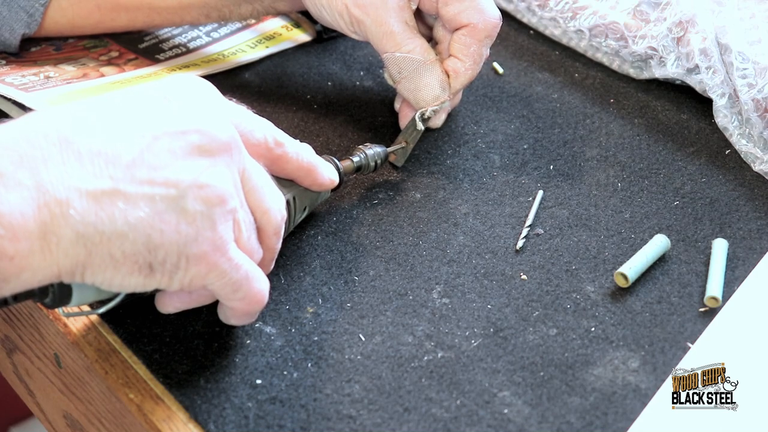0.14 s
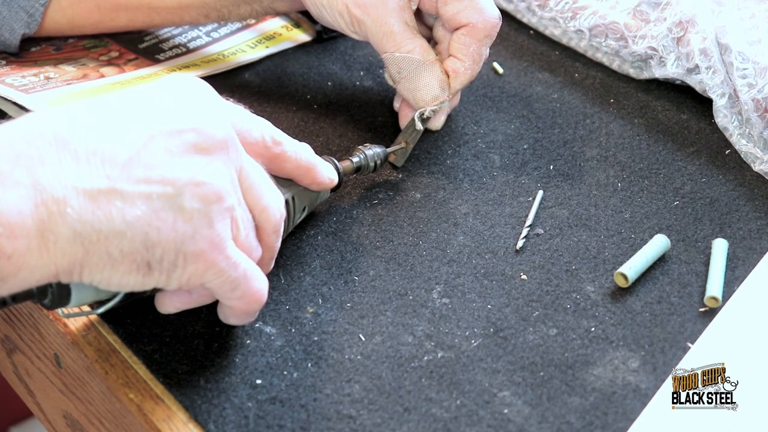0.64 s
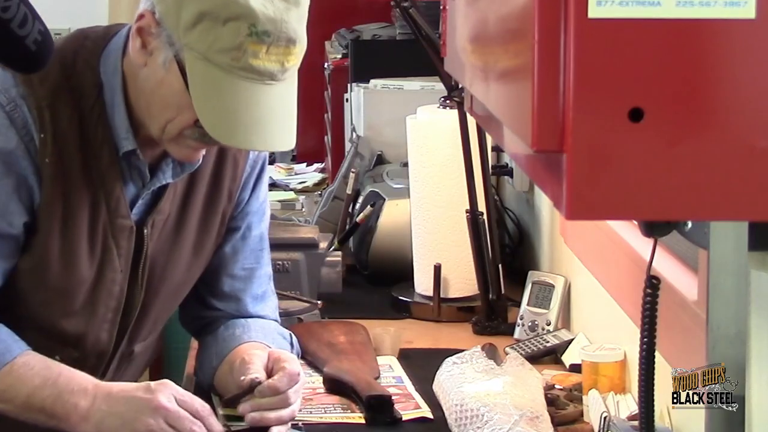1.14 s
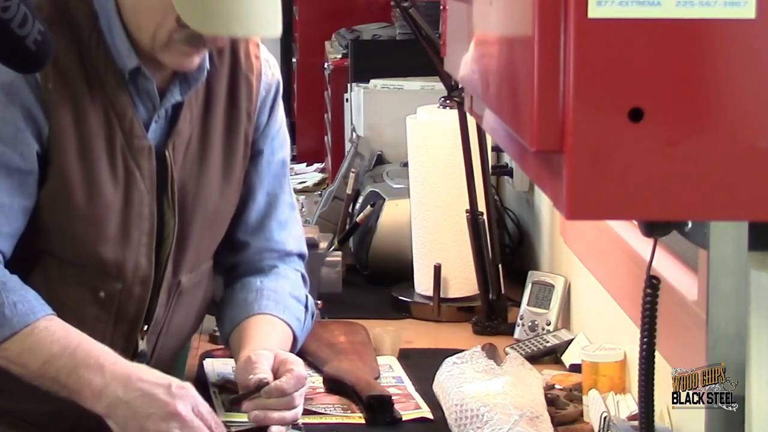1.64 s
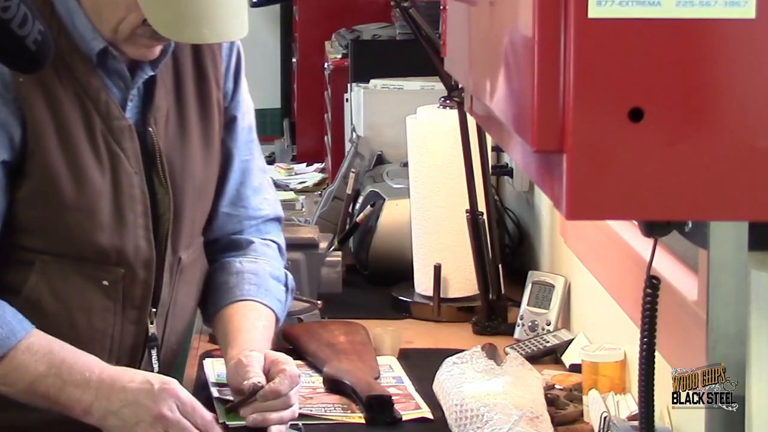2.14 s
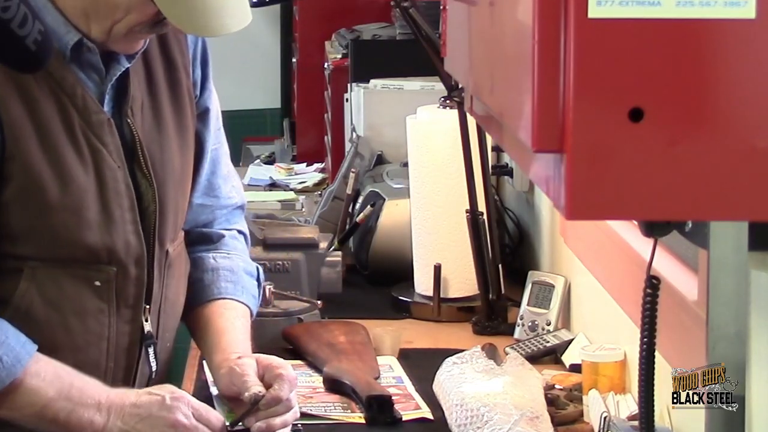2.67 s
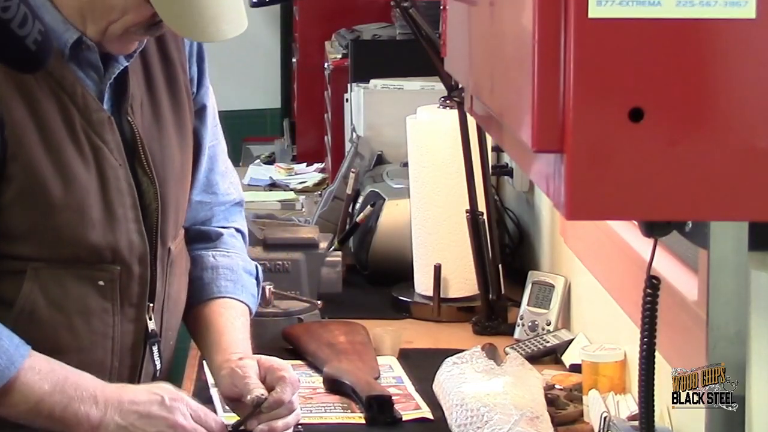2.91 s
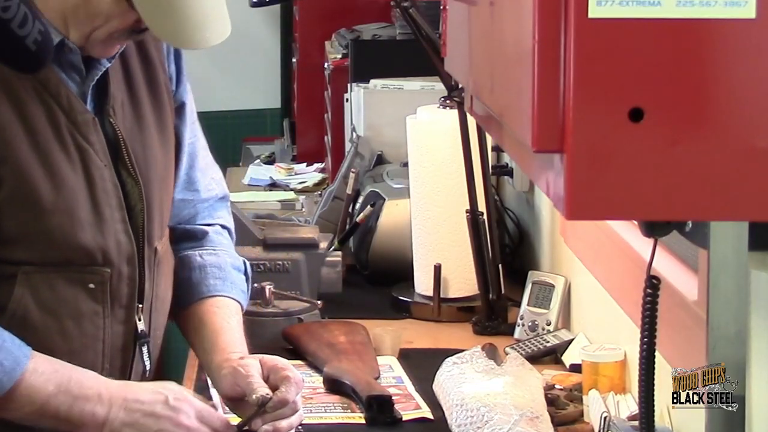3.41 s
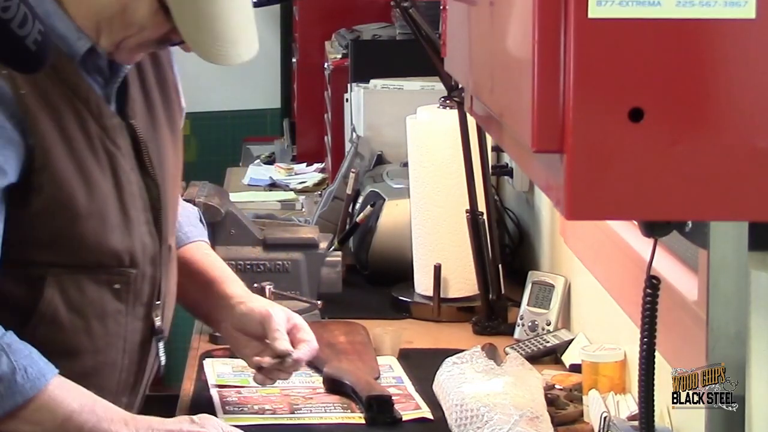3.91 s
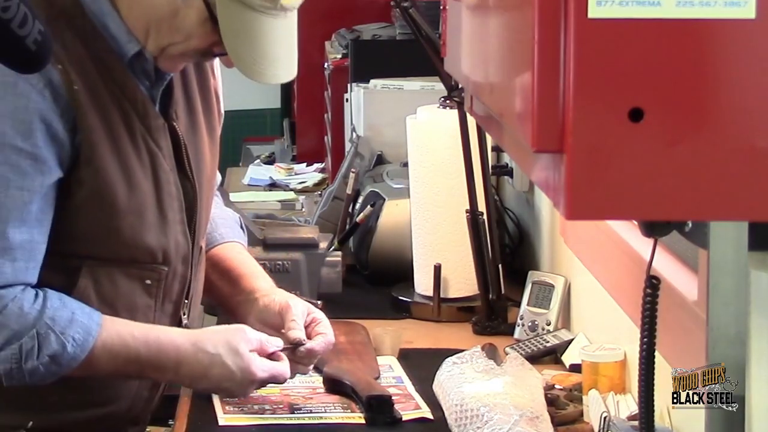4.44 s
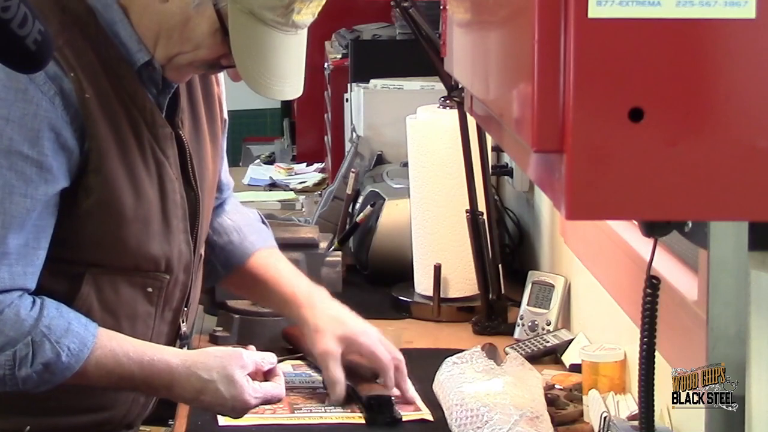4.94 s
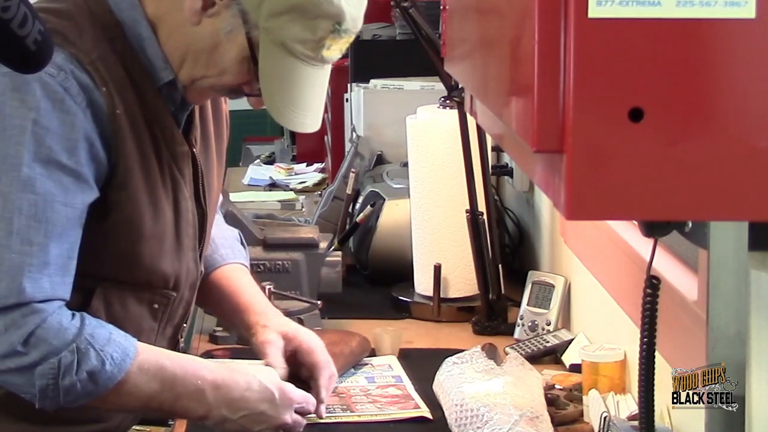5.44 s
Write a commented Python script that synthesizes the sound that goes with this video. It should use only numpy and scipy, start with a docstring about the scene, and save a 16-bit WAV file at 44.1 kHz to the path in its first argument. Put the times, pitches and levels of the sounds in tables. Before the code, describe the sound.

A small rotary tool whines hard against its work, jumps to a smoother, faster whine, then coasts down to silence and faint bench rustling.

```python
"""A small hand-held rotary tool whines as it bites into wood; the sound jumps abruptly at 0.73 s to a faster whine.
The whine is a stack of sine tones at multiples of the shaft speed; from 2.6 s they slide down as the rotor coasts.
Shaped random noise makes its air and brush hiss; ringing bench tones and noise bursts make thuds and clicks.
Hands and paper rustle near the end; a quiet workshop lies under it all, and gain control evens the loudness."""
import sys
import numpy as np
from scipy import signal
from scipy.io import wavfile
from scipy.ndimage import uniform_filter1d

SR = 44100
rng = np.random.default_rng(int(sys.argv[2]) if len(sys.argv) > 2 else 0)


def store_pcm(level_fs):
    """Save levels as 16-bit WAV."""
    pcm = np.round(np.clip(level_fs, -1, 1) * 32767).astype(np.int16)
    wavfile.write(sys.argv[1], SR, np.atleast_2d(pcm).T)


def volts(x):
    """Linear amplitude factor 10**(x/20) for a level x in dB, scalar or array-like."""
    e = np.asarray(x, float) / 20
    return 10 ** e


N = 245633  # length in samples

FRAME_S = np.arange(N // 256 + 5) * 256 / SR  # times of the noise frames
BIN_HZ = np.fft.rfftfreq(1024, 1 / SR)
JUMP_S = 0.73  # the sound jumps abruptly to a faster whine
BLEND_S = 2.49  # the level blend towards coasting begins; the speed falls from 2.608 s
RING_RISE_S = 1.25
TOP_ORDER = 90  # highest multiple of the shaft speed that gets its own tone
# how the noise fades as the rotor coasts: t/s, level/dB
FADE_CURVE = [(2.61, -4), (3.0, -9), (3.15, -16.5), (3.4, -19), (3.95, -27), (4.07, -32.5), (4.25, -57)]


def whine():
    """A spinning shaft repeats with each turn, so it sounds at multiples (orders) of the shaft speed."""
    # shaft speed sags, jumps up, creeps higher, then falls when coasting: t/s, f/Hz
    speed = [(0, 507.2), (.5, 498.3), (.727, 495), (.732, 504.8), (1.09, 509.5), (1.488, 513.8), (1.6, 516),
             (2.15, 516.7), (2.608, 518.5), (2.856, 422.2), (3.03, 356.9), (3.144, 316.2), (3.292, 263.6),
             (3.508, 190.2), (3.6, 160.9), (3.732, 123), (3.95, 58), (4.12, 22)]
    # once-a-turn tone, which swells and sinks as the tool is moved: t/s, level/dB
    fundamental = [(0, -21.5), (.51, -22), (.65, -16.5), (.726, -15.5), (.733, -26), (.98, -18.5),
                   (1.27, -10.5), (1.6, -5.5), (1.85, -13.5), (2.1, -13.5), (2.3, -7), (2.6, -8),
                   (2.67, -13.5), (2.86, -10), (3.0, -12), (3.13, -21.5), (3.2, -32.5), (3.29, -30.5),
                   (3.36, -27), (3.53, -39), (3.62, -34), (3.7, -67)]
    # third order: t/s, level/dB
    third = [(0, -19.5), (.25, -21.5), (.45, -33.5), (.705, -32.5), (.718, -18), (.85, -23.5), (1.0, -15),
             (1.5, -20), (2.0, -19), (2.6, -17.5), (3.02, -26), (3.1, -39), (3.5, -48), (3.6, -79)]
    # tone of the bearing cage: t/s, level/dB
    cage_curve = [(.7, -51.5), (1.0, -56.5), (1.35, -41.5), (2.9, -41), (3.1, -55.5)]
    step = 64  # levels are worked out once every 64 samples
    t = np.arange(round(speed[-1][0] * SR)) / SR
    slow = t[::step]
    hz = curve(speed, slow)
    turns = np.cumsum(np.interp(t, slow, hz)) / SR
    # the once-a-turn tone drops out as the rotor slows
    first_db = curve(fundamental, slow) - 20 * np.clip((slow - 3.537) * 100, 0, 1)

    shape = (TOP_ORDER + 1, len(slow))
    waver = wander(shape, (60, 1), (40, 1))
    flutter = wander(shape, (8, 1))
    broken = wander(shape, (32, 1), (20, 1))
    # neighbouring orders flare together
    broken = evened(broken + 0.8 * uniform_filter1d(broken, size=4, axis=0))
    start, spread = rng.random(TOP_ORDER + 1), rng.standard_normal(TOP_ORDER + 1)
    coasting = np.clip((slow - BLEND_S) / 0.38, 0, 1)
    wobbling = coasting ** 2  # the slowing rotor runs less evenly
    # the rectified supply throbs the torque until the blend begins
    throb = (t < BLEND_S) * np.sin(2 * np.pi * 120.2 * t)
    out = volts(-59) * throb

    for k in range(1, TOP_ORDER + 1):
        if k == 1:
            beat_hz, beat_depth = 17.3, 0.45
            beat = np.cos(2 * np.pi * beat_hz * (slow - 3.345))
            beat *= np.clip((slow - 3.2) * beat_hz, 0, 1)
            db = first_db + 20 * np.log10(1 + beat_depth * beat)
        elif k == 3:
            db = curve(third, slow) + 1.3 * wobbling * broken[k]
        else:
            if k == 2:
                coast_db = np.minimum(-51, first_db - 12) + 5.0 * wobbling * broken[k]
            else:
                coast_db = coasting_db(k, slow, hz, spread[k], broken[k])
            db = (1 - coasting) * driven_db(k, slow, waver[k]) + coasting * coast_db
        level = volts(db + 0.37 * flutter[k]) * (k * hz < 15800)
        first = np.argmax(level > 0) * step  # silent until it falls into range
        blur_turns = 0.0024 * waver[-k] + 0.007 * np.sqrt(k) * wobbling * flutter[-k]
        phase = k * turns[first:] + start[k] + np.interp(t[first:], slow, blur_turns)
        pulse = 1 + 0.21 * min(k / 6, 1) * throb[first:]  # higher orders throb more
        out[first:] += np.interp(t[first:], slow, level) * pulse * np.sin(2 * np.pi * phase)

    cage = volts(curve(cage_curve, slow) + 1.2 * waver[0]) * (slow < 3.1)
    # the bearing cage turns at a share of the shaft speed
    out += np.interp(t, slow, cage) * np.sin(2 * np.pi * 0.368 * turns)
    rest = (0, N - len(t))
    return np.sqrt(2) * np.pad(out, rest), np.pad(turns, rest, "edge")


def driven_db(k, t, waver):
    """Level of order k at full speed: each order has its own strength, and most change at the jump."""
    # high whistling orders: order, level at the start/dB, level just before the jump without dulling/dB,
    # level after the jump/dB
    leading = [(16, -39, -26.5, -40.5), (18, -39, -36.5, -34)]
    # other orders: order, level before the jump without dulling/dB, level after it/dB
    others = [(4, -36, -32), (5, -33.5, -36), (9, -38.5, -40.5), (19, -42, -47), (25, -39.5, -60.5),
              (17, -36.5, -59.5), (23, -40.5, -46), (24, -50, -43.5)]
    # the orders that swell and sink as the tool is turned in the hand: order
    turning_orders = [2, 6, 7, 8]
    # their levels: t/s, order 2 level/dB, order 6 level/dB, order 7 level/dB, order 8 level/dB
    turning = [(0, -26, -34, -22, -30), (.33, -27.5, -35.5, -45, -25), (.45, -24.5, -33.5, -27, -26.5),
               (.6, -19, -35.5, -27.5, -31), (.722, -28.5, -34.5, -25.5, -27),
               (.74, -33.5, -39.5, -42, -24), (1.05, -25.5, -27, -37, -28.5),
               (1.4, -32.5, -41.5, -30, -31.5), (2.05, -31, -36, -30.5, -23.5),
               (2.27, -31.5, -38, -31.5, -36), (2.501, -28.5, -33, -35.5, -28)]
    if k in turning_orders:
        times, *levels = np.transpose(turning)
        return np.interp(t, times, levels[turning_orders.index(k)]) + 1.6 * waver
    table = {order: (early, early, late) for order, early, late in others}
    table |= {order: row for order, *row in leading}
    enter_db, deep_db, late_db = table.get(k, (-49, -49, -49))  # weak orders share one level
    early_db = enter_db + (deep_db - enter_db) * t / JUMP_S
    if k >= 16:  # high orders are muffled as the bit sinks in
        dull_s = 0.4
        early_db -= 10 * np.clip((t - dull_s) / (JUMP_S - dull_s), 0, 1)
    return np.where(t < JUMP_S, early_db, late_db) + 2.55 * waver


def coasting_db(k, t, hz, spread, broken):
    """Level of order k as the rotor coasts: it follows the hiss and rings the housing as it slides down."""
    # level of the orders against the hiss: t/s, level/dB
    over_hiss = [(2.8, -2.5), (3.25, 3.5), (3.55, 2.5), (3.75, -1), (4.0, -6)]
    # order 18 stands above its neighbours where the housing passes it: f/Hz, lift/dB
    slot_lift = [(1000, 3), (1400, 11), (2400, 12), (2900, 0), (6200, 0), (6800, 8), (7080, -9), (7330, -9),
                 (7420, 8)]
    db = hiss_db(k * hz, t) + 10 * np.log10(hz) + curve(over_hiss, t)
    db -= max(9 - k, 0) + 5 * (k in (6, 7)) + max(k - 60, 0) / 3  # the fainter orders
    db -= 3.5 * (k % 2)  # odd orders are weaker
    db += rings_db(k * hz) * np.clip((t - BLEND_S) / RING_RISE_S * 2, 0, 1)
    unsteady_db = 1.5 if k == 18 else np.clip(k / 4, 2, 5)
    db += 0.8 * spread + unsteady_db * broken
    return db + read(slot_lift, k * hz) * (k == 18)


def rush(turns):
    """Fan air and brush hiss through the housing, patchy and puffing once a turn."""
    shape = (len(BIN_HZ), len(FRAME_S))
    patches = wander(shape, (16, 0), (12, 1))
    shape_db = hiss_db(BIN_HZ[:, None], FRAME_S) + 1.4 * patches
    shape_db -= 80 * (FRAME_S > FADE_CURVE[-1][0])
    pitch_share = BIN_HZ / SR * 2  # 0 in the deep bass, 1 at the very top
    # the treble flares in bursts during the coast
    gusts = wander(shape, (90, 0), (7, 1))
    shape_db += 5 * gusts * np.outer(pitch_share, swell(FRAME_S))
    # the rings stand out as the air dies
    ringing = np.clip((FRAME_S - BLEND_S) / RING_RISE_S, 0, 1) ** 2
    shape_db += 1.6 * np.outer(rings_db(BIN_HZ) * np.clip(1 - pitch_share, 0, 1), ringing)
    puffs = 1 + 0.25 * np.sin(2 * np.pi * turns)
    return np.sqrt(SR / 2) * (noise(shape_db) * puffs + brush_ticks(turns, shape_db + 2.9 * patches))


def brush_ticks(turns, shape_db):
    """One tick a turn from the rotor: a rough whir above the counted orders."""
    hz = np.gradient(turns) * SR
    ticks = np.diff(np.floor(turns), prepend=0) * np.sqrt(SR / (hz + 1))
    ticks *= np.clip(hz / 85 - 1, 0, 1)  # silent below 85 turns a second
    z = signal.stft(np.pad(ticks, (0, SR)), nperseg=1024, noverlap=768)[2][:, :len(FRAME_S)]
    above = BIN_HZ[:, None] > TOP_ORDER * np.interp(FRAME_S, np.arange(N) / SR, hz)
    return signal.istft(z * above * volts(shape_db - 2), nperseg=1024, noverlap=768)[1][:N]


def hiss_db(hz, t):
    """Air and brush noise per Hz at frequency hz and time t: coloured by the housing, fading with the rotor."""
    # colour of the noise by the housing: f/Hz, relative level/dB
    housing = [(60, -48.5), (250, -51), (420, -35), (750, -36.5), (1050, -26), (1500, -23.5), (2300, -28.5),
               (2800, -30), (3700, -27.5), (4500, -31.5), (5100, -35.5), (8000, -34.5), (12300, -33.5),
               (15700, -40.5), (16000, -72)]
    # noise by band without colour and fade: f/Hz, level before the jump/dB, level after it/dB,
    # share of the fade (no unit), brief swell during the coast/dB
    bands = [(248, -24, -23, 1.2, 3), (500.5, -24.5, -26.5, 0.72, 8.5), (1390, -21, -21.5, 1.39, 7),
             (3300, -25.5, -26, 1.264, -3), (7140, -25, -27, 1.176, 0), (10700, -31.5, -33, 1.46, 0.5),
             (12500, -33.5, -32.5, 1.4, 7.5), (14000, -28.5, -31.5, 1.2, 7.5), (15300, -33.5, -36, 0.95, 1)]
    # the hiss is briefly brighter just after the jump: f/Hz, lift/dB
    flare = [(1500, 1.9), (7000, 5.6)]
    # extra level of the highest treble, mostly above 13 kHz: t/s, level/dB
    treble = [(2.61, 2), (2.95, 5), (3.12, 0.5), (3.3, 2), (3.6, 10.5), (4.1, -1.5)]
    # how much of that extra is used: f/Hz, share (no unit)
    treble_share = [(13000, 0.14), (15000, 1)]
    columns = [read([(row[0], row[k]) for row in bands], hz) for k in range(1, 5)]
    early_db, late_db, fade_share, swell_db = columns
    late_db = late_db + read(flare, hz) * (t < JUMP_S + 0.083)
    coast_db = fade_share * curve(FADE_CURVE, t) + swell_db * swell(t)
    coast_db = coast_db + read(treble_share, hz) * curve(treble, t)
    return read(housing, hz) + np.where(t < JUMP_S, early_db, late_db) + coast_db


def rings_db(hz):
    """Narrow resonances of the housing, each a peak that lifts nearby sound while coasting."""
    # f/Hz, half-width at half the lift/Hz, relative lift/dB
    rings = [(3100, 190, 11), (3550, 130, 6), (4500, 160, 7), (12400, 350, 5)]
    return sum(db / (1 + ((hz - centre_hz) / width) ** 2) for centre_hz, width, db in rings)


def swell(t):
    """A smooth rise and fall during the coast, from 0 to 1 and back."""
    return np.exp(-((t - 3.043) / 0.37) ** 2)


def thud(db, hard_db, bounce_db):
    """A blunt blow and one bounce ring the modes of the bench top."""
    # natural tones of the hollow bench: f/Hz, relative level/dB, time to fall by 60 dB/s
    bench = [(76, -27, 0.37), (156, 7, 0.044), (158, -27, 0.45), (211.7, -5, 0.041), (511, -4.5, 0.014)]
    t = np.arange(SR // 2) / SR
    ring = np.zeros(len(t))
    for hz, mode_db, t60 in bench:
        # a harder blow lifts the higher tones
        mode_db = mode_db + hard_db * np.log2(hz / 150)
        ring += volts(mode_db - 60 * t / t60) * np.sin(2 * np.pi * hz * t)
    ring *= (1 - np.exp(-t / 0.0091)) ** 2  # the soft contact builds up over a few ms
    add(ring, 0.022, volts(bounce_db) * ring.copy())
    return volts(db) * ring


def tick(db, hz, t60):
    """A sharp snap and a short rattle of noise around one resonance."""
    t = np.arange(SR // 4) / SR
    drive = rng.standard_normal(len(t))
    drive[0] = 2.2 * np.sqrt(SR / hz)  # the snap
    band = signal.butter(2, [hz * 0.63, hz * 1.19], "band", fs=SR)
    return volts(db - 60 * t / t60) * evened(signal.lfilter(*band, drive))


def room(x):
    """Echoes off the room: sparse taps of random sign dying away."""
    taps = np.zeros(SR // 2)
    at = np.arange(300, SR // 2 - 20, 20)
    taps[at + rng.integers(0, 20, len(at))] = rng.choice([-1., 1.], len(at))
    taps *= volts(-60 * np.arange(len(taps)) / SR / 0.35)  # falls by 60 dB in 0.35 s
    return signal.fftconvolve(x, taps / np.linalg.norm(taps))[:N]


def shop():
    """Steady noise for the room tone, with the faint rustle of hands and paper as short swells of noise."""
    # colour of the room tone: f/Hz, relative level/dB
    room_spectrum = [(30, 1), (240, 6), (700, 0.5), (1300, -9), (5000, -16), (15700, -19.5), (16000, -44.5)]
    # colour of the rustles: f/Hz, relative level/dB
    rustle_spectrum = [(30, -3.5), (70, 4), (600, -9), (1300, -4), (1700, -10), (2000, -5.5), (2300, -8),
                       (2850, -11), (3400, -4.5), (4200, -8), (5000, -17), (15700, -26), (16000, -57)]
    # rustles: start t/s, length/s, relative level/dB, level lost by the end/dB
    rustles = [(4.072, 0.475, -65, 8.5), (4.919, 0.11, -52.5, 7.5), (5.028, 0.158, -66, -5),
               (5.2, 0.068, -54.5, 4.5), (5.277, .3, -64.5, 2.5)]
    rustle = np.zeros(len(FRAME_S))
    for s, length, db, lost_db in rustles:
        inside_s = np.minimum(FRAME_S - s, s + length - FRAME_S)
        edge = np.clip(inside_s / 0.0294 + 0.5, 0, 1)  # soft start and end
        rustle += volts(2 * (db - lost_db * (FRAME_S - s) / length)) * edge ** 2
    patches = wander((len(BIN_HZ), len(FRAME_S)), (5, 0), (20, 1))
    # twice the dB turns amplitude into power
    power = volts(2 * (read(room_spectrum, BIN_HZ) - 72))[:, None]
    power = power + np.outer(volts(2 * read(rustle_spectrum, BIN_HZ)), rustle)
    return volts(20.5) * noise(10 * np.log10(power) + 1.7 * patches)


def noise(db):
    """Random short-time spectra with the given levels, bins by frames; 0 dB gives unit power."""
    a, b = rng.standard_normal(db.T.shape + (2,)).T
    return signal.istft((a + 1j * b) * volts(db), nperseg=1024, noverlap=768)[1][:N] / np.sqrt(512)


def wander(shape, *smoothings):
    """Random values smoothed by each (length, axis) in turn, so that they drift slowly."""
    x = rng.standard_normal(shape)
    for length, axis in smoothings:
        x = uniform_filter1d(x, length, axis)
    return evened(x)


def evened(x):
    """Scales to an rms level of 1."""
    return x / np.sqrt(np.mean(x ** 2) + 1e-20)


def curve(points, t):
    """Straight lines through (time, value) points."""
    return np.interp(t, *np.transpose(points))


def read(points, hz):
    """Lines through (frequency, value) points, on a logarithmic frequency scale."""
    f, value = np.transpose(points)
    return np.interp(np.log(hz + 1), np.log(f + 1), value)


def add(mix, s, sound):
    """Adds a sound to the mix at s seconds."""
    part = mix[round(s * SR):][:len(sound)]
    part += sound[:len(part)]


def scene():
    """The tool, the thuds and clicks with their echoes, and the workshop, alike on both channels."""
    # low thuds, the first at the abrupt jump: t/s, relative level/dB, hardness/dB per octave,
    # relative bounce level/dB
    thuds = [(0.736, -14.5, -11, -15.5), (0.807, 4, 13.5, -13), (2.644, -16, -3, -5), (3.169, -23.5, 8, -8),
             (3.841, 3, 5, -10.5), (5.215, -2.5, 0, -10)]
    # clicks, the first at the abrupt jump: t/s, level/dB, centre f/Hz, time to fall by 60 dB/s
    ticks = [(0.729, -22, 530, 0.039), (2.61, -18, 3710, 0.06), (3.078, -22, 4460, 0.037),
             (3.661, -36.5, 530, 0.25), (4.632, -52, 5500, 0.012), (4.9131, -38, 1380, 0.04),
             (4.9205, -33, 3460, 0.0088), (4.922, -37, 590, 0.056), (5.223, -48.5, 3870, 0.073)]
    tones, turns = whine()
    hits = np.zeros(N)
    for s, *row in thuds:
        add(hits, s, thud(*row))
    for s, *row in ticks:
        add(hits, s, tick(*row))
    mono = tones + rush(turns) + shop() + hits + volts(-10.5) * room(hits)
    return np.array([mono, mono])


def band_limit(x):
    """A steep low-pass at the top of the band."""
    return signal.sosfilt(signal.butter(12, 16940, fs=SR, output="sos"), x)


def record(dry):
    """One microphone that rolls off the bass, on both channels; gain control; faint converter hiss."""
    miked = signal.lfilter(*signal.butter(1, 60, "high", fs=SR), dry)
    # gain control turns down what is louder than the knee, judged over 0.31 s
    knee_db, ratio = -17, 2.83
    power = abs(uniform_filter1d(miked[0] ** 2, round(0.31 * SR)))
    over_db = np.maximum(10 * np.log10(power + 1e-12) - knee_db, 0)
    miked = miked / volts((1 - 1 / ratio) * over_db)
    mix = miked + volts(-67) * rng.standard_normal(dry.shape)
    return band_limit(mix)


dry = scene()
out = record(dry)
store_pcm(out)
```